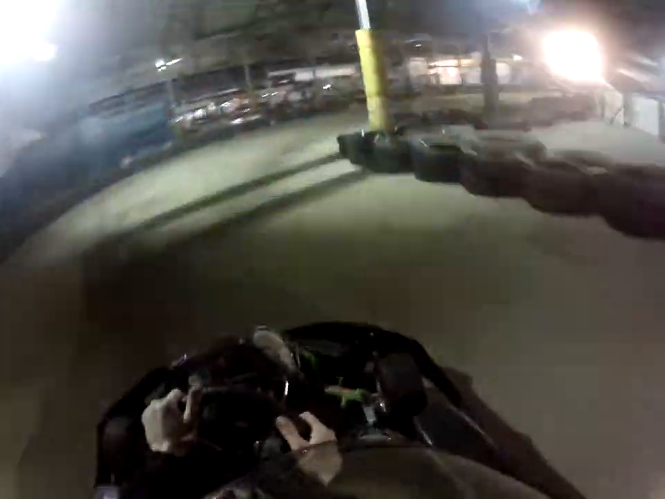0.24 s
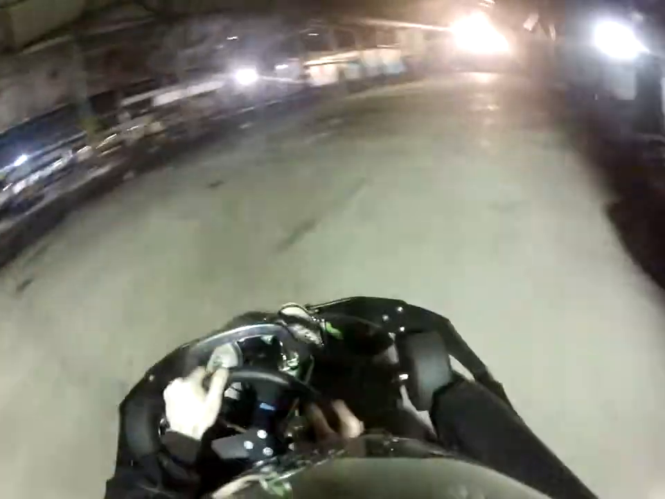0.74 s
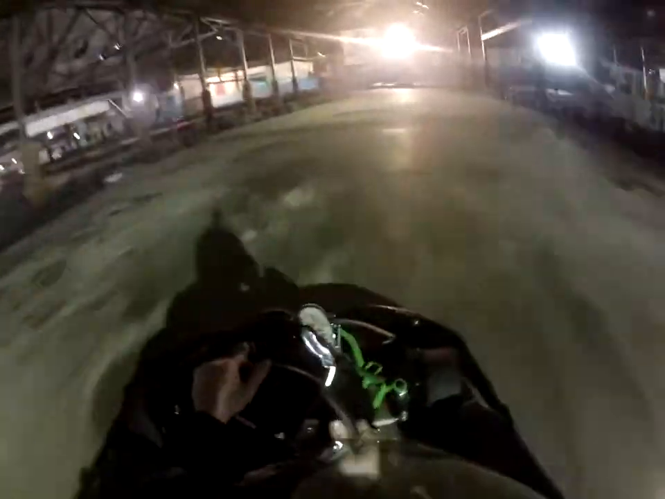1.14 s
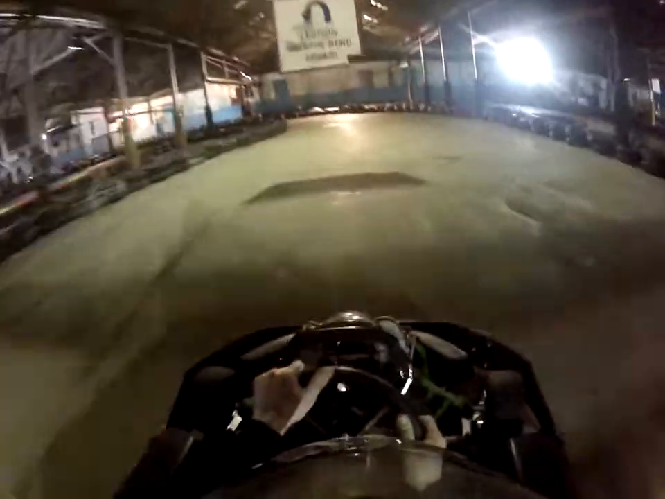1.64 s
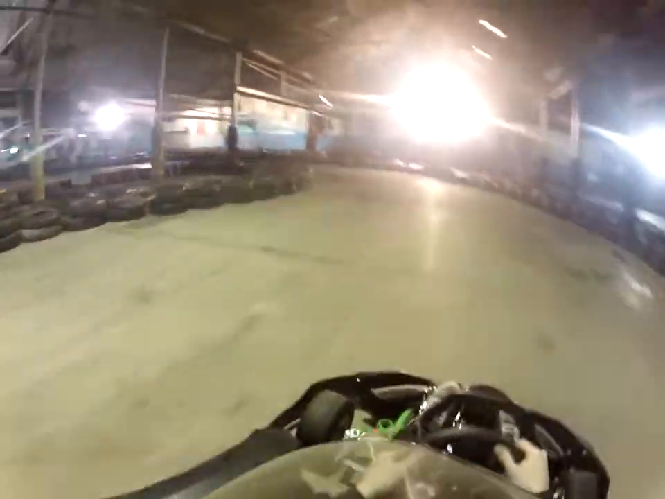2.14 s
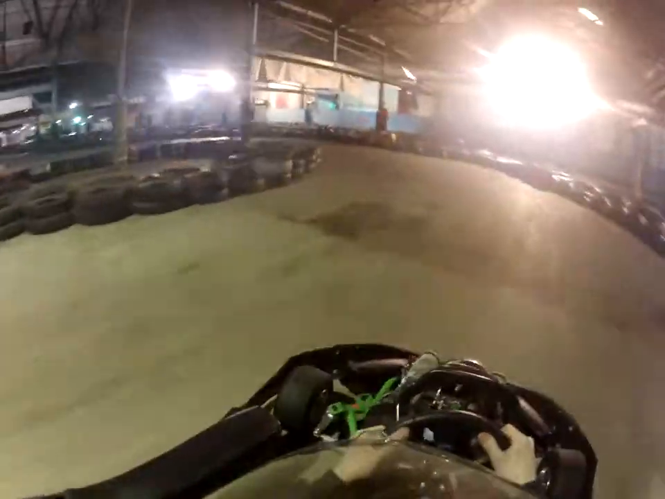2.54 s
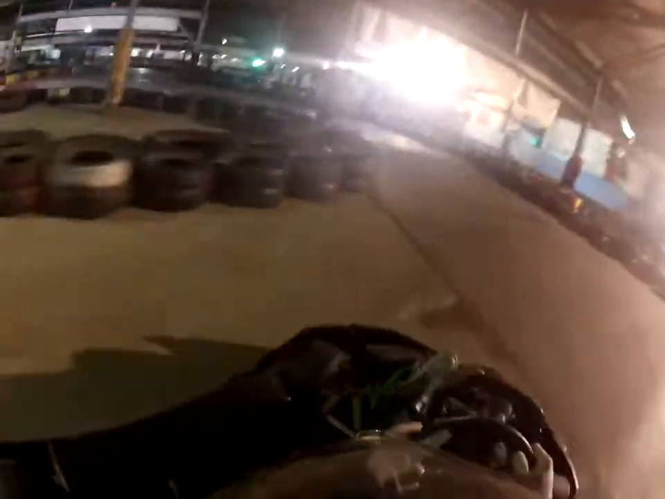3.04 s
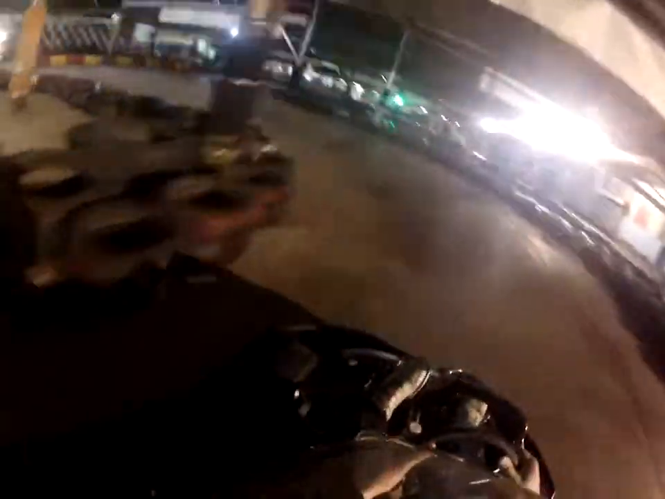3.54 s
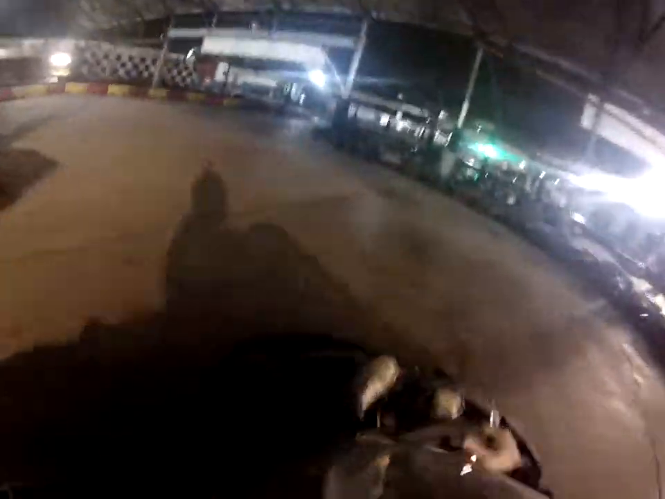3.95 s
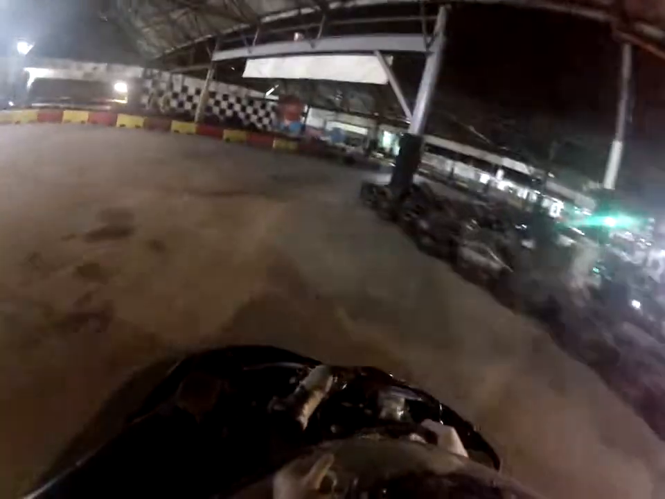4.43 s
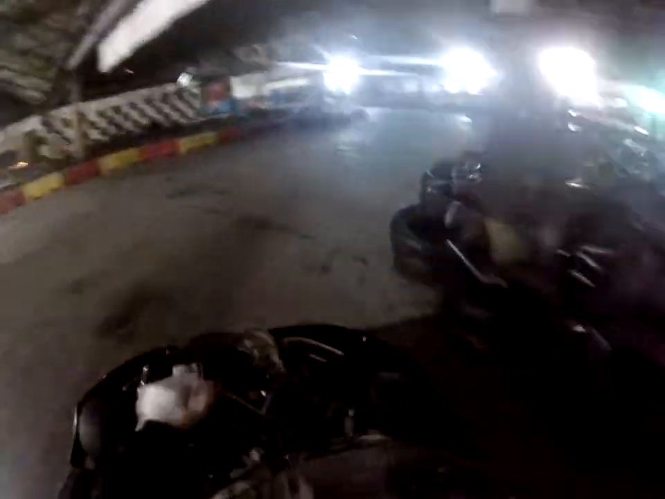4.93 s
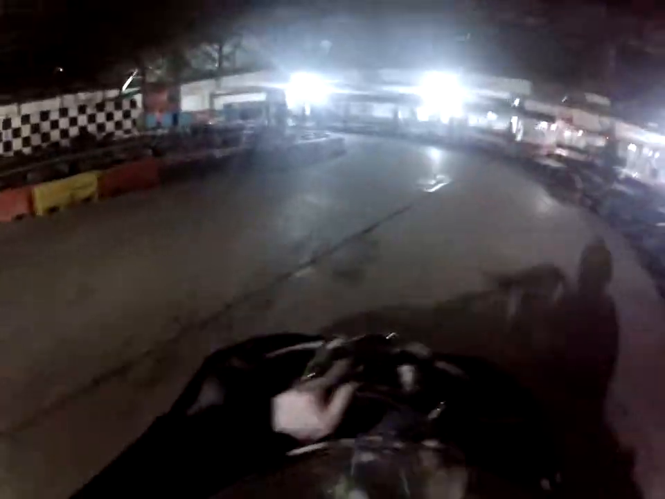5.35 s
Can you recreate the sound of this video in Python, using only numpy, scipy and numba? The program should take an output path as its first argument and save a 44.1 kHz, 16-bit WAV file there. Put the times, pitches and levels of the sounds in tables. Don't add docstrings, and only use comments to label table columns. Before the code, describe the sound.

A continuous onboard kart ride on an indoor track, heard in mono through a sealed helmet camera near a single-cylinder engine. The engine swells in within 0.2 s and drones fast, a low fluttering buzz of about 41 to 42 firings a second with raspy gas noise. Deep wind buffeting and soft bass thumps hit hard from 0.6 to 1.6 s; dry plastic latch ticks snap around 0.95 and 1.26 s. At 1.55 s the throttle shuts: pitch sags to about 34 firings by 2.2 s, quieter and more muffled, with case knocks near 2.4 and 2.55 s. A short dab comes at 2.6-2.9 s, then another lull. From 3.2 s it pulls again, labouring, rougher and clattery, wavering slightly in pitch. Hollow pings cluster at 3.65-3.75 and 5.05-5.18 s; bumps strengthen at 5.25 and 5.5 s. Tyre rumble and gritty, mirrored treble persist until the abrupt end.

```python
import sys
import numpy as np
from scipy import signal
from scipy.io import wavfile
from scipy.ndimage import uniform_filter1d
from numba import njit

SR = 44100
rng = np.random.default_rng(int(sys.argv[2]) if len(sys.argv) > 2 else 0)


def master(y):
    cut = np.clip(np.atleast_2d(y).T, -1, 1)
    pcm = np.round(cut * 32767)
    wavfile.write(sys.argv[1], SR, pcm.astype(np.int16))


def gain_from_db(level_db):
    decades = np.asarray(level_db, float) / 20
    return 10 ** decades


N = 246519

# [t/s, firing rate f/Hz]
REVS = [(0.0, 41.12), (0.78, 42.38), (1.49, 41.43), (1.85, 39.44), (2.05, 37.4), (2.19, 34.3),
        (2.72, 33.36), (2.91, 34.46), (3.21, 32.73), (3.53, 34.34), (3.86, 32.55), (3.92, 34), (4.4, 33.55),
        (4.67, 34.69), (4.89, 33.45), (5.06, 36.23), (5.17, 35.2), (5.59, 34.77)]
# [t/s, level/dB]
ENGINE = [(0.0, -26), (0.19, -18.5), (1.23, -19), (1.37, -18.5), (1.84, -24.5), (2.22, -24.5), (2.48, -31),
          (2.83, -21.5), (3.18, -29.5), (3.19, -22), (3.28, -22), (4.39, -24), (4.47, -21.5), (5.59, -23)]
# [opens t/s, shuts t/s, labour 0-1]
THROTTLE = [
    (0.07, 1.55, 0),
    (2.59, 2.92, 0.46),
    (3.187, 6, 1),
]
# [multiple of firing rate, level/dB]
FAST_PARTIALS = [(1, 0), (2, -17), (3, -41), (4, -6.5), (5, -14.5), (6, -9), (7, -19.5), (8, -15),
                 (9, -11.5), (10, -9), (11, -20.5), (12, -51), (13, -22), (14, -20.5), (15, -28),
                 (16, -26.5)]
# [multiple of firing rate, level/dB]
SLOW_PARTIALS = [(1, 0), (2, -32), (3, -12), (4, -9), (5, 0.5), (6, -2.5), (7, -36.5), (8, -23), (9, -7),
                 (10, -4), (11, -7), (12, -20), (13, -14), (14, -16), (15, -53), (16, -19.5)]
# [multiple of firing rate, level/dB]
COAST_PARTIALS = [(1, -3), (2, -7), (3, -9), (4, 0), (5, 1.5), (6, -4), (7, -3.5), (8, -1.5), (9, -4.5),
                  (10, -19), (11, -15.5), (12, -18), (13, -30), (14, -30), (15, -30), (16, -36)]
# [f/Hz, width/Hz, level/dB]
CASE = [(713, 104, -5), (1066, 97, -4.5), (1359, 147, -9), (1650, 122, -8), (1980, 390, -4),
        (2335, 152, -1.5), (2760, 338, -9), (3330, 110, -9), (3700, 246, -4.5), (4990, 436, -10.5),
        (5764, 340, -13.5)]
# [f/Hz, density level/dB per Hz]
ROAD = [(20, 19), (45, 12), (80, -23), (170, 12), (300, 2), (420, 3.5), (520, -14), (900, -4), (2000, -31)]
# [t/s, level/dB]
WIND = [(0, -12.5), (.39, -43), (.64, -20.5), (1.25, -25), (1.42, -15), (1.67, -19), (1.9, -25),
        (2.15, -24), (2.6, -24), (3.0, -24.5), (3.13, -24), (3.26, -23), (3.45, -34), (3.75, -23.5),
        (4.3, -24), (4.8, -26.5), (5.3, -22), (5.59, -21.5)]
# [t/s, peak level/dB, ring f/Hz]
JOLTS = [(0.246, -15, 34), (0.464, -10, 36.5), (0.569, -25, 45), (0.63, -3, 37.8), (0.716, -0.5, 35.6),
         (0.891, -8, 37.3), (1.019, -5, 31.2), (1.229, -6.5, 40), (1.343, 1, 35.2), (1.447, -4, 38.8),
         (1.58, -7, 35.7), (2.183, -12, 37.3), (2.721, -13.5, 38), (3.035, -12.5, 36.22),
         (3.327, -31, 38.76), (3.501, -12.5, 42.05), (3.567, -11.5, 38.5), (3.891, -8.5, 37.3),
         (4.027, -11, 32.33), (4.161, -12, 35.7), (4.385, -13, 36), (4.514, -10.5, 38.6),
         (4.831, -14, 36.3), (4.921, -15, 36.52), (5.009, -18, 42.4), (5.251, -5, 37.1),
         (5.516, -4.5, 33.3)]
# [t/s, peak level/dB, centre f/Hz, decay/s]
TICKS = [
    (0.9268, -10, 3830, 0.002),
    (0.93, -18, 3600, .001),
    (.9318, -11, 2190, 0.0015),
    (0.9851, -4, 4070, 0.0014),
    (.9860, -10, 2250, 0.002),
    (0.992, -3.5, 4070, 0.0009),
    (.9985, -10, 4199, 0.0012),
    (1.2628, -3.5, 2190, 0.0022),
    (1.2635, -9, 4220, 0.002),
    (1.2684, -10, 3530, .001),
]
# [t/s, peak level/dB, ring f/Hz]
PINGS = [(1.2216, -8, 1980), (1.3308, -23, 2240), (2.8769, -13, 1920), (3.3862, -30, 1938),
         (3.6489, -4, 2104), (3.6765, -8, 1980), (3.7143, -9, 1980), (3.7445, -13, 3700),
         (4.0472, -28, 1890), (4.4026, -10.5, 2310), (5.047, -12, 2199), (5.0786, -12, 1650),
         (5.104, -6.5, 1615), (5.1046, -15, 2322), (5.104, -20, 3340), (5.161, -7.5, 2230),
         (5.179, -10, 2310)]
# [t/s, peak level/dB, thump level/dB]
KNOCKS = [
    (1.304, -22, -24),
    (2.378, -25, -28),
    (2.402, -15, -15),
    (2.5509, -21, -14),
    (3.1987, -17.5, -13),
    (3.271, -24, -20),
    (4.1611, -20.5, -46),
    (5.1018, -20, -14),
]
# [t/s, peak level/dB, half length/s]
HUM = [
    (2.21, -30, 0.23),
    (3.0, -37, .12),
    (3.45, -35, 0.071),
    (4.503, -32.5, 0.17),
]

DRONE_DB, COAST_DRONE_DB = -1, 2.25
BARK_DB, COAST_BARK_DB, FAST_BARK_DB = -2.5, -5.5, 1.5
RASP_DB, COAST_RASP_DB = -27, -0.27
RASP_FOLLOW = 0.37
VALVE_DB, COAST_VALVE_DB, LABOUR_VALVE_DB = -37, 0.7, 4.5
FAST_COAST_VALVE_DB = -3
BEAT, COAST_BEAT, FAST_BEAT = 0.4, -0.19, -0.27
PEDAL_S, LABOUR_S = 0.07, 1.83
HUNT_HZ, HUNT_PEAK_S, HUNT_DEPTH_HZ = 3.23, 0.678, 0.55
WANDER_HZ = 0.3
MOUNT_WIDTH_HZ, MOUNT_T60_S, T60_S_PER_DB = 24, 0.39, 0.0148
HUM_HZ, HUM_REST_DB = 185, -38
COAST_ROAD_DB = -5


def set_rms(x, db):
    return x * gain_from_db(db) / np.sqrt(np.mean(x ** 2))


def curve(rows):
    s, *columns = np.transpose(rows)
    return [np.interp(np.arange(N) / SR, s, c) for c in columns]


@njit
def svf(x, hz, width):
    y, b, l = np.empty(len(x)), 0., 0.
    g, k = np.tan(np.pi * hz / SR), width / hz
    for i in range(len(x)):
        v = (b + g * (x[i] - l)) / (1 + g * (g + k))
        b, l, y[i] = 2 * v - b, l + 2 * g * v, k * v
    return y


def twice(x, hz, width):
    return svf(svf(x, 1. * hz, 1. * width), 1. * hz, 1. * width)


def svf_noise(hz, width):
    return set_rms(svf(rng.standard_normal(N), 1. * hz, 1. * width), 0)


def walk(rate):
    k = int(SR / rate)
    steps = np.repeat(rng.standard_normal(N // k + 1), k)
    return 1.33 * uniform_filter1d(uniform_filter1d(steps, k), k)[:N]


def add(out, s, burst):
    i = int(s * SR)
    out[i:i + len(burst)] += burst[:N - i]


def ring(hz, t60, rise, kick=0):
    t = np.arange(int(t60 * SR)) / SR
    hurried = t + kick * (1 - np.exp(-t / .01))
    return -np.sin(2 * np.pi * hz * hurried) * (1 - np.exp(-t / rise)) * gain_from_db(-60 * t / t60)


def case(shake, modes):
    out = 0
    for k, (hz, width, db) in enumerate(modes):
        out = out + (-1) ** k * gain_from_db(db + 0.53 * walk(9)) * twice(shake, hz, 1.9 * width)
    return set_rms(out, 0)


def pedal():
    t = np.arange(N) / SR
    throttle = labour = 0
    for opens, shuts, weight in THROTTLE:
        ramp = np.clip((t - opens) / PEDAL_S, 0, 1) * np.clip(1 - (t - shuts) / PEDAL_S, 0, 1)
        throttle = throttle + ramp
        labour = labour + ramp * weight * np.exp(-((t - opens) / LABOUR_S) ** 2)
    return throttle, labour


def share_fast(hz):
    return np.clip((hz - 34) / 8, 0, 1)


def loudness(hz):
    coast = 1 - pedal()[0]
    drone_db = curve(ENGINE)[0] + DRONE_DB + COAST_DRONE_DB * coast
    bark_db = BARK_DB + COAST_BARK_DB * coast + FAST_BARK_DB * share_fast(hz) * (1 - coast)
    return drone_db, bark_db


def frame():
    t = np.arange(N) / SR
    swell = gain_from_db(HUM_REST_DB)
    for s, db, half in HUM:
        swell = swell + gain_from_db(db) * np.exp(-((t - s) / half) ** 2)
    note = np.sin(2 * np.pi * HUM_HZ * t + 0.75 * walk(5) + 0.18 * walk(5.4))
    return np.sqrt(2) * swell * gain_from_db(2.1 * walk(13)) * note


def road(levels):
    out, (f, db) = 0, np.transpose(ROAD)
    drone_db, bark_db = (uniform_filter1d(c, size=SR // 6) for c in levels)
    coast = 1 - pedal()[0]
    for hz in 25 * 2 ** np.arange(0, 6, .5):
        band_db = np.interp(np.log(hz), np.log(f), db) + 10 * np.log10(hz / 170)
        band_db = band_db + (hz > 270) * 0.26 * bark_db + (hz > 380) * COAST_ROAD_DB * coast
        out = out + gain_from_db(band_db + 0.61 * walk(5.974)) * svf(svf_noise(hz, hz / 2), hz, hz / 2)
    return out * gain_from_db(drone_db - 16.5)


def mount():
    out = gain_from_db(curve(WIND)[0] - 2.0 + 0.7 * walk(9)) * svf_noise(31.6, MOUNT_WIDTH_HZ)
    for s, db, hz in JOLTS:
        t60 = max(MOUNT_T60_S + T60_S_PER_DB * db, .05)
        add(out, s, gain_from_db(db) * ring(hz, t60, 0.0025, kick=0.0046))
    return out


def latch():
    out, t = np.zeros(N), np.arange(SR // 30) / SR
    for s, db, hz, decay in TICKS:
        crack = rng.standard_normal(len(t)) * np.exp(-t / max(decay, .0004))
        tick = twice(crack, hz, .7 * hz)
        add(out, s, gain_from_db(db - 3.5) * tick / np.abs(tick).max())
    return out


def knocks():
    shake, out, t = np.zeros(N), np.zeros(N), np.arange(SR // 30) / SR
    for s, db, thump_db in KNOCKS:
        add(shake, s, gain_from_db(db) * rng.standard_normal(len(t)) * np.exp(-t / 0.0091))
        add(out, s - .002, -gain_from_db(thump_db + 2.5) * ring(134.0, 0.04, 0.0012))
    for s, db, hz in PINGS:
        add(out, s - .002, gain_from_db(db) * ring(hz, 0.038, 0.0033))
    return out + case(shake, CASE) * np.std(shake) * gain_from_db(-4.5)


def rasp(hz, turns):
    (throttle, labour), fast, engine_db = pedal(), share_fast(hz), curve(ENGINE)[0]
    coast = 1 - throttle
    follow_db = RASP_FOLLOW * (engine_db - engine_db.mean())
    rasp_db = RASP_DB + follow_db + COAST_RASP_DB * coast
    valve_db = VALVE_DB + follow_db + LABOUR_VALVE_DB * labour
    valve_db = valve_db + (COAST_VALVE_DB + FAST_COAST_VALVE_DB * fast) * coast
    depth = np.clip(BEAT + COAST_BEAT * coast + FAST_BEAT * fast, 0, 1)
    size = gain_from_db(1.2 * rng.standard_normal((int(turns[-1]) + 2, 2)))[turns.astype(int)].T
    puff = size[0] * np.exp(1.8 * (np.cos(2 * np.pi * turns + np.pi) - 1))
    after = turns % 1 - .4
    clack = size[1] * (after > 0) * np.exp(-np.abs(after) / 0.56)
    grit = gain_from_db(0.19 * walk(300) + 0.59 * walk(22.31))
    gas = rng.standard_normal(N) * grit * (1 - depth + 1.9 * depth * puff)
    valves = rng.standard_normal(N) * grit * (1 - depth + 1.54 * depth * clack)
    draught = case(rng.standard_normal(N) + 0.79 * gas, CASE[1:4])
    boom = svf(gas, 1. * CASE[0][0], 1. * CASE[0][1]) * gain_from_db(5 + 4 * throttle)
    body = case(gas, CASE[4:7]) * gain_from_db(-0.5) + draught * gain_from_db(-8.0) + boom
    return gain_from_db(rasp_db) * body + gain_from_db(valve_db) * case(valves, CASE[7:])


def even(x):
    return x / np.sqrt(uniform_filter1d(x ** 2, size=SR // 5) + 1e-9)


def exhaust(hz, turns, levels):
    (drone_db, bark_db), fast, throttle = levels, share_fast(hz), pedal()[0]
    low = high = 0
    rows = zip(FAST_PARTIALS[1:], SLOW_PARTIALS[1:], COAST_PARTIALS[1:])
    for (k, fast_db), (_, slow_db), (_, coast_db) in rows:
        open_db = fast * fast_db + (1 - fast) * slow_db
        db = throttle * open_db + (1 - throttle) * coast_db
        lag = np.pi / 2 * k * k if k < 7 else .55 * k * k - 4.7 * k
        partial = gain_from_db(db + 1.3 * walk(8)) * np.sin(2 * np.pi * k * turns + lag + .2 * walk(8))
        upper = np.clip((k * hz - 270) / 30, 0, 1)
        low = low + (1 - upper) * partial
        high = high + upper * partial
    return gain_from_db(drone_db - 2.27) * (even(low) + gain_from_db(bark_db + 0.33) * even(high))


def scene():
    hz, = curve(REVS)
    fast = share_fast(hz)
    hunt = np.cos(2 * np.pi * HUNT_HZ * (np.arange(N) / SR - HUNT_PEAK_S))
    hz = hz + WANDER_HZ * (1 - fast) * walk(7) + HUNT_DEPTH_HZ * fast ** 2 * hunt
    turns = np.cumsum(hz * (1 + .004 * walk(20))) / SR
    levels = loudness(hz)
    background = frame() + road(levels)
    handling = mount() + latch() + knocks()
    return (background + handling + rasp(hz, turns) + exhaust(hz, turns, levels))[None]


def low_pass(x):
    return signal.sosfilt(signal.butter(12, 15700, fs=SR, output="sos"), x)


def record(dry):
    squeezed = np.tanh(.4 * dry) / .4
    slow = signal.resample_poly(squeezed, 40, 147, axis=1)
    held = signal.resample_poly(np.repeat(slow, 4, axis=1), 147, 160, axis=1)
    top = signal.ellip(12, .2, 60, 15290, fs=SR, output="sos")
    mix = np.clip(signal.sosfilt(top, held[:, :N]), -1, 1)
    return low_pass(mix)


dry = scene()
out = record(dry)
master(out)
```